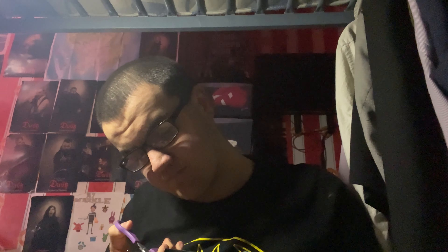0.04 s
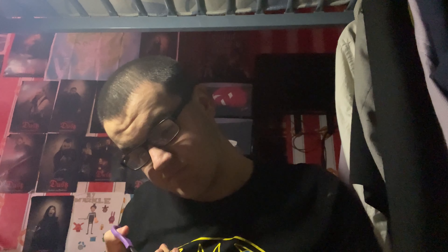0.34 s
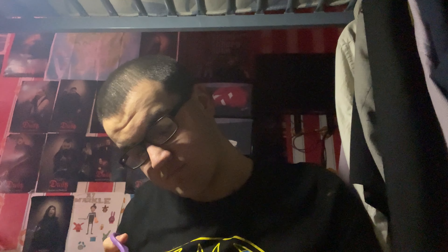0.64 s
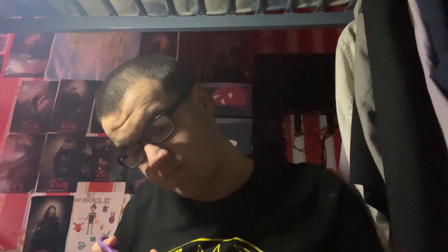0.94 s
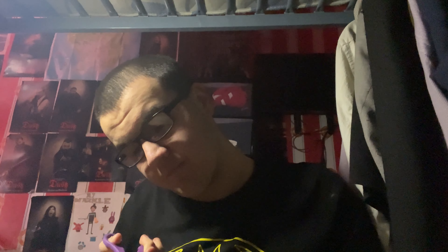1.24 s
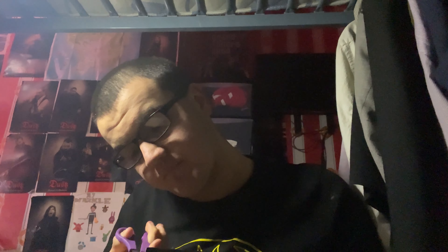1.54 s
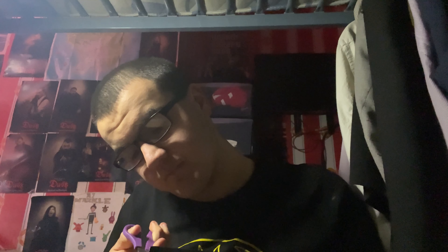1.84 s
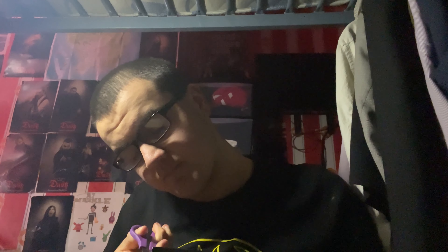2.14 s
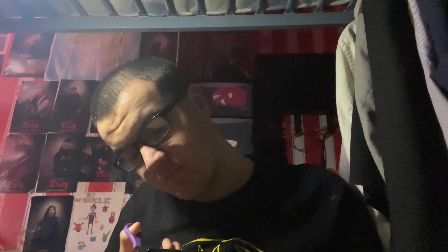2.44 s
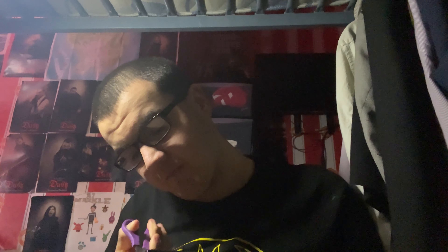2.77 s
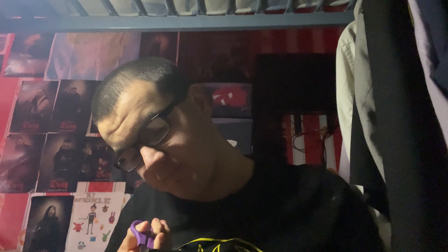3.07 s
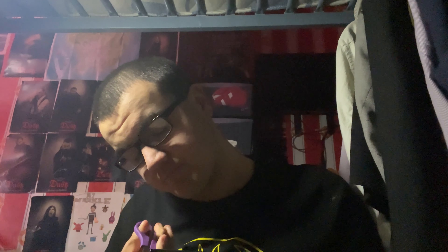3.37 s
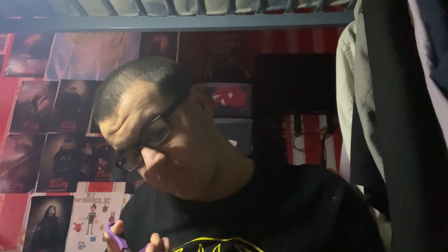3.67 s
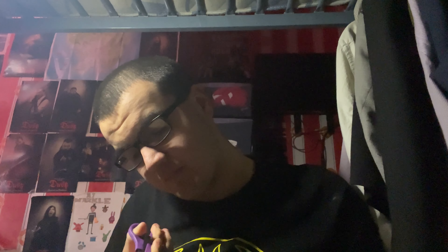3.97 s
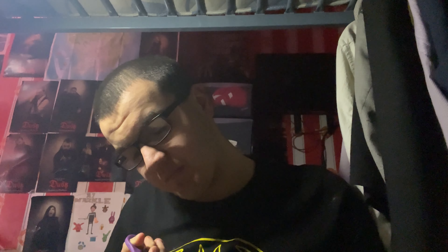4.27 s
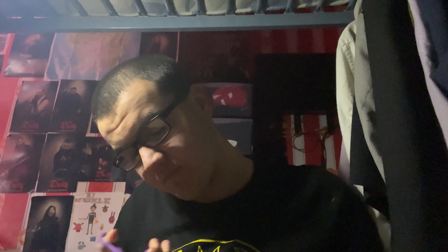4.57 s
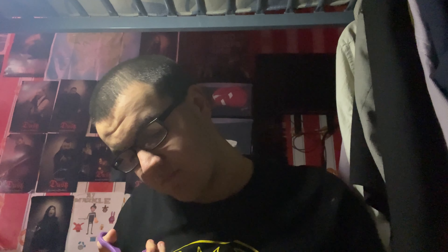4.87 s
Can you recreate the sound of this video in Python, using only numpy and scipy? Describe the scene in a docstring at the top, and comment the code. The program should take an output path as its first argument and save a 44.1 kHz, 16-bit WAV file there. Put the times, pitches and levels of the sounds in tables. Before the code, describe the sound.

Close up, a scissor blade slides in short, scratchy strokes along the taped seam of a cardboard box. Sharp, uneven snaps and small crackles break out as the tape gives, and the box booms softly under a hand. The middle is sparser, mostly separate clicks; then a heavy snap and a bright, sizzling crack with a thump stand out. The small room sounds dry, with a faint low rumble underneath.

```python
"""A faint tick, then soft booms and a low rub: scissors start through the packing tape of a cardboard box,
close to a phone microphone in a small, cluttered room. The blade slides along the seam; the tape
catches and snaps, and each snap rings the flaps and walls. A heavy snap shakes the walls, a bright one
cracks and sizzles; pushes on the box make the air inside it boom. A faint rumble lies underneath."""
import sys
import numpy as np
from scipy import signal
from scipy.fft import rfft, irfft, next_fast_len
from scipy.io import wavfile

SR = 44100
rng = np.random.default_rng(int(sys.argv[2]) if len(sys.argv) > 2 else 0)


def unload_audio(sound):
    """Save the sound as a 16-bit wav file, at the path given as the first command line argument."""
    columns = np.transpose(np.atleast_2d(sound))
    # keep every value between -1 and 1, then stretch to whole-number steps
    steps = np.round(np.clip(columns, -1, 1) * 32767)
    wavfile.write(sys.argv[1], SR, steps.astype(np.int16))


N = 225402
RING_S = np.arange(6000) / SR  # time since a blow


def undb(db):
    """Decibels to gain."""
    return 10 ** (np.asarray(db) / 20)


def unit(x):
    """Scale to rms 1."""
    return x / np.sqrt(np.mean(x ** 2))


def blow(x, db):
    """Give a short stereo sound the energy of 10 ms at this level."""
    return x * undb(db) * np.sqrt(SR / 100 / np.mean(np.sum(x ** 2, axis=1)))


def add(out, s, x):
    """Mix x into out from time s."""
    i = max(int(s * SR), 0)
    out[:, i:i + x.shape[1]] += x[:, :max(N - i, 0)]


def high_pass(x, hz):
    """Second-order bass cut."""
    return signal.sosfilt(signal.butter(2, hz, "high", fs=SR, output="sos"), x)


def colour(x, points):
    """Causal filter with a (Hz, dB) response."""
    n = 2 * next_fast_len(x.shape[1])
    hz, db = np.transpose(points)
    bin_hz = np.arange(n // 2 + 1) * SR / n
    log_gain = np.log(undb(np.interp(np.log(bin_hz + 1), np.log(hz), db)))
    cepstrum = irfft(log_gain)
    cepstrum[1:n // 2] *= 2  # fold to minimum phase
    cepstrum[n // 2 + 1:] = 0
    return irfft(rfft(x, n) * np.exp(rfft(cepstrum)))[:, :x.shape[1]]


def tilted(points, db_per_octave):
    """A spectrum leaned about its first point."""
    hz, db = np.transpose(points)
    return np.column_stack([hz, db + db_per_octave * np.log2(hz / hz[0])])


def stereo_noise(n, side_db):
    """White noise with this much side against mid."""
    mid, side = rng.standard_normal((2, n))
    return unit(mid + undb(side_db) * side * np.array([[1], [-1]]))


def wander(rate_hz):
    """Smooth random wander, spread near 1."""
    knots = rng.standard_normal(N // 100)
    return np.interp(np.arange(N) / SR * rate_hz, np.arange(len(knots)), knots)


def part_levels(parts, db, brightness):
    """Level of each part of a sound; a brighter contact lifts the higher parts more."""
    return [db + part_db + brightness * octaves for part_db, octaves in parts]


def ring(modes, centre_hz, octaves, rise_ms, scatter_db=3, lag_ms=0.18, spread_hz=2200):
    """Damped modes; the place of the blow favours those near one pitch."""
    hz, db, t60 = np.transpose(modes)
    detune, size, phase, skew = rng.standard_normal((4, len(modes)))
    gain = undb(db + scatter_db * size) / (1 + (np.log2(hz / centre_hz) / octaves) ** 4)
    poles = np.exp((2j * np.pi * hz * (1 + 0.021 * detune) - np.log(1000) / t60) / SR)
    # higher modes reach the two microphone ports less alike
    apart = 2 * np.pi * hz * lag_ms / 1000 + skew * hz / spread_hz
    starts = np.array([gain * np.exp(1j * (2 * np.pi * phase - shift)) for shift in (apart, 0)])
    ports = (starts @ np.vander(poles, len(RING_S), increasing=True)).imag
    return ports * (1 - np.exp(-(RING_S * 1000 / rise_ms) ** 2))


# The quiet room around the microphone. Each row: frequency in Hz, relative level in dB.
RUMBLE_SPECTRUM = [(22, -15.5), (52, 5.5), (90, 1), (170, -9), (330, -13), (560, -18.5), (800, -15.5),
                   (1100, -24), (2000, -29.5), (3500, -35), (8000, -42), (13000, -43), (15000, -57)]

def room_tone():
    """A faint rumble that wavers a little."""
    rumble = unit(colour(stereo_noise(N, side_db=-3), RUMBLE_SPECTRUM))
    return rumble * undb(-67 + 1.2 * wander(rate_hz=9))


def room_echo(x, t60_s, wet_db, gap_s):
    """Clothes and near walls return a short, dull echo to the microphone."""
    swell = 1 - np.exp(-(RING_S / gap_s) ** 2)
    tail = stereo_noise(len(RING_S), side_db=0) * swell * np.exp(-np.log(1000) * RING_S / t60_s)
    tail = colour(tail, [(80, 16), (400, 0), (900, -10), (2000, -8), (6000, -21), (14000, 1)])
    tail /= np.sqrt(np.mean(np.sum(tail ** 2, axis=1)))
    return x + undb(wet_db) * signal.fftconvolve(x, tail, axes=1)[:, :N]


# The air in the box. Each row: frequency in Hz, level in dB, time to fall 60 dB in seconds.
BOX_AIR_MODES = [(65, -9, 0.041), (81.5, 1, .13), (132, -3.5, .085), (173, -3.5, 0.12), (213, 2, .08)]
# The hand on the box. Each row: start in seconds, relative level in dB, boom centre in Hz.
HAND_PUSHES = [(.117, -48, 100), (0.223, -43, 89), (0.254, -32, 96), (0.464, -38.5, 111),
               (0.675, -38.5, 187), (0.732, -43, 86), (0.915, -48, 97), (1.8, -52, 127), (2.344, -52, 108),
               (2.872, -40, 233), (3.042, -33.5, 217), (3.435, -44.5, 131), (3.678, -45, 112),
               (4.18, -43, 80), (4.238, -41.5, 170), (4.517, -32.5, 150), (4.55, -27.5, 120.4)]

def pushes():
    """The box gives under the hand and booms softly; deeper booms take longer to build."""
    out = np.zeros((2, N))
    for s, db, hz in HAND_PUSHES:
        boom = ring(BOX_AIR_MODES, centre_hz=hz, octaves=.55, rise_ms=700 / hz, scatter_db=2)
        add(out, s, blow(boom, db + .5))
    return out * undb([[1.6], [-1.6]])  # a little left of the microphone


def crinkles(per_second, size, fade_ms):
    """Gain that jumps wherever a thread of glue lets go."""
    chance, sizes = rng.random(N), size * rng.exponential(size=N)
    jumps = (chance < per_second / SR) * sizes
    return 1 + signal.lfilter([1], [1, -np.exp(-1000 / (fade_ms * SR))], jumps)


# The stiff top flaps. Each row: frequency in Hz, level in dB, time to fall 60 dB in seconds.
TOP_FLAP_MODES = [(645, -17, 0.16), (727.7, -7, 0.071), (792, 2.5, 0.066), (894, -1.5, 0.048),
                  (1141, -9, 0.045), (1322, 1.5, 0.028), (1477, 4, 0.023), (1648, 4.5, 0.017),
                  (1717, 6, 0.022), (1992, 4, 0.025), (2178, 2.5, 0.032)]
# The blade dragging on them. Each row: frequency in Hz, relative level in dB.
DRAG_SPECTRUM = [(450, -21.5), (700, 3), (860, -3), (1040, -15), (1320, -3.5), (1750, -8.5), (2300, -14),
                 (3600, -44.5)]

def flap_scrape(grain, slip_db, hollow):
    """Slow slips let the flaps ring, so the scrape turns into a hollow creak."""
    slips = stereo_noise(N, side_db=-21.5) * grain
    flaps = ring(TOP_FLAP_MODES, centre_hz=900, octaves=0.18, rise_ms=1)
    creak = unit(signal.fftconvolve(slips, flaps, axes=1)[:, :N])
    drag = unit(colour(stereo_noise(N, side_db=0.5) * undb(slip_db), DRAG_SPECTRUM))
    return np.sqrt(hollow) * creak + np.sqrt(1 - hollow) * drag


# Walls and tape at close range. Each row: frequency in Hz, relative level in dB.
WALL_RUB_SPECTRUM = [(70, 1.5), (130, -4), (220, 2), (330, 5.5), (440, 2.5), (580, -18), (900, -46)]
RASP_SPECTRUM = [(1600, -13.5), (2600, 5), (3200, -0.5), (3800, 7), (5000, -2), (6600, 2.5), (8000, -27),
                 (11000, -28.5)]
SIZZLE_SPECTRUM = [(5500, -17), (7500, -10), (9000, -4), (11500, -2), (14000, -12), (16000, -9.5)]
# A stroke's rasp, then its hiss. Each row: level against the flaps in dB, octaves above them.
RASP_AND_HISS = [(-9, 0.5), (-22, 4.1)]
# The blade along the seam. Each row: moment of greatest speed in seconds, length in seconds,
# level in dB, weight on the walls in dB, brightness in dB per octave.
BLADE_STROKES = [(0.192, .2, -70.5, -1, 6), (0.256, .6, -61, 12.5, -3.5), (0.405, 0.15, -53.5, 2.5, -4),
                 (0.646, 0.37, -45, 3, 0.9), (0.742, .19, -43, -4, 0.5), (1.018, .18, -59, 3, -2),
                 (1.169, .18, -57, 0, -12), (1.444, .2, -59.5, 2.5, -9), (1.586, 0.27, -64, -9, 2.8),
                 (2.018, .18, -60, 0, -13), (2.384, 0.24, -59, 3.5, 0.8), (2.671, 0.6, -67.5, 1.5, -7),
                 (2.839, 0.33, -67.5, -4, 3.5), (3.086, 0.2, -56, 0, 2), (3.455, 0.16, -51, 2.5, 2),
                 (3.688, 0.71, -64, 8.5, -2.3), (3.929, .14, -55.5, -1, 0.6), (4.083, 0.22, -63, 7, 0.2),
                 (4.186, 0.077, -42.5, 8, 0.5), (4.55, .14, -41.5, 5.5, 1.5),
                 (4.714, 0.18, -63.5, -1, -0.5), (5.061, 0.35, -61.5, 9.5, -8.5)]

def slide():
    """The blade sticks and slips along the seam, shaking walls and flaps; the tape rasps and hisses."""
    t = np.arange(N) / SR
    speeds, levels_db = [], []
    for s, length_s, db, weight_db, brightness in BLADE_STROKES:
        speeds.append(np.interp(t, [s - length_s / 2, s, s + length_s / 2], [0, 1, 0]) ** 1.31)
        levels_db.append((db + weight_db, db, *part_levels(RASP_AND_HISS, db, brightness)))
    rub_gain, scrape_gain, rasp_gain, hiss_gain = undb(levels_db).T @ np.array(speeds)
    slip_db = 3 * wander(rate_hz=60) + 3.2 * wander(rate_hz=470)
    # on a slow slide single crinkles stand out; on a fast one they merge
    slow = 1 / (1 + rasp_gain / undb(-62.5))
    grain = crinkles(per_second=70, size=3, fade_ms=1) ** slow
    scrape = flap_scrape(grain, slip_db, hollow=.6 * slow)
    rub = unit(colour(stereo_noise(N, side_db=-9.5) * undb(slip_db), WALL_RUB_SPECTRUM))
    rasp = unit(colour(stereo_noise(N, side_db=-2) * grain * undb(.5 * slip_db), RASP_SPECTRUM))
    hiss_spectrum = tilted(SIZZLE_SPECTRUM, db_per_octave=-4.5)
    hiss = unit(colour(stereo_noise(N, side_db=-3.5) * grain * undb(.3 * slip_db), hiss_spectrum))
    return rub_gain * rub + scrape_gain * scrape + rasp_gain * rasp + hiss_gain * hiss


def glue_ticks(per_stroke, spread_db=6.5, stroke_share=0.39, tear_ms=2.5):
    """Threads of glue let go at random in mid-stroke: rows of small snaps in the stroke's own colour."""
    rows = []
    for s, length_s, db, weight_db, brightness in BLADE_STROKES:
        for place in (np.arange(per_stroke) + rng.random(per_stroke)) / per_stroke - .5:
            level_db = db - 10 + spread_db * rng.standard_normal()
            rows.append((s + stroke_share * length_s * place, level_db, weight_db, brightness, tear_ms))
    return rows


def tear(ms, spectrum, side_db, tail_db, tail_s, rise_ms=0.98):
    """A burst of tiny ruptures in the tape swells and dies, with a short scatter inside the box."""
    t_ms = RING_S * 1000
    burst = np.exp(-t_ms / (2 * ms)) + undb(tail_db) * np.exp(-RING_S / tail_s)
    swell = 1 - np.exp(-(t_ms / rise_ms) ** 2)
    return colour(stereo_noise(len(RING_S), side_db) * burst * swell, spectrum)


# The wide box walls. Each row: frequency in Hz, level in dB, time to fall 60 dB in seconds.
BOX_WALL_MODES = [(259, -3.5, 0.18), (304.4, -1.5, 0.076), (326.1, -1, 0.08), (391, -2, 0.044),
                  (415.7, -7, 0.11), (452.6, 0.5, 0.07), (560, -11.5, 0.048)]

def cardboard_knock(flap_db, weight_db, tear_ms):
    """Harder snaps ring the walls higher; weight on the walls rings the flaps lower."""
    wall_hz = 352 * 2 ** ((flap_db + 45.5) / 106)
    flap_hz = 1089 * 2 ** (-weight_db / 56)
    walls = ring(BOX_WALL_MODES, wall_hz, octaves=0.44, rise_ms=0.7)
    flaps = ring(TOP_FLAP_MODES, flap_hz, octaves=0.67, rise_ms=.5 * tear_ms, lag_ms=.11, spread_hz=2000)
    return blow(high_pass(walls, hz=227), flap_db + weight_db) + blow(high_pass(flaps, hz=450), flap_db)


# The scissor blades. Each row: frequency in Hz, level in dB, time to fall 60 dB in seconds.
STEEL_MODES = [(2756, 6, 0.025), (3166, -4, 0.041), (3442, -7, 0.038), (3766, 3, 0.023), (4082, -2, 0.022),
               (5200, -11, 0.029), (5576, -2, 0.017), (5950, -6, .022), (6120, -7.5, 0.013)]

def blade_clink(sharpness):
    """Steel damped by hand and tape; a sharper contact rings it higher."""
    return ring(STEEL_MODES, centre_hz=3750 * 2 ** sharpness, octaves=.55, rise_ms=0.4,
                scatter_db=8.5, lag_ms=.05, spread_hz=3000)


# Breaking tape at close range. Each row: frequency in Hz, relative level in dB.
CRUNCH_SPECTRUM = [(400, -15.5), (650, 0.5), (850, 11.5), (1030, -2), (1320, -11), (1750, -9), (2300, -4),
                   (3500, -39.5)]
CRACK_SPECTRUM = [(1500, -25.5), (2300, -2), (2700, -0.5), (3200, -9.5), (3750, -14), (4400, -1),
                  (5000, -8), (6300, -10.5), (7500, -11), (10000, -52)]
# A snap's crack, then its sizzle. Each row: level against the flaps in dB, octaves above them.
CRACK_AND_SIZZLE = [(-5, 1.62), (-20, 3.62)]
# Snaps and blade ticks, just in front of the microphone. Each row: start in seconds, flap level in dB,
# weight on the walls in dB, brightness in dB per octave, tear length in milliseconds.
TAPE_SNAPS = [(.0632, -62.5, 1, 0, 2.4), (.2479, -47, 11.5, -20, 7.1), (.4026, -46.5, -9, -8, 1.1),
              (.456, -46.5, 10.5, -22, 24), (.6695, -33.5, -8, 0.4, 2.9), (.6729, -32, 3, -2, 2.8),
              (.6783, -38, -5, 0.5, 17), (.7307, -29, -14.5, -4, 5.4), (.8306, -51, -0.5, 1, .5),
              (.9598, -54.5, 2.5, -4, 4.2), (.9988, -37, -15.5, 1, 1.5), (1.0425, -49, -1, 0, 1.5),
              (1.0639, -51, -6, 0.9, .8), (1.1186, -49.5, -7, -4, 1.9), (1.1376, -49.5, -2, -1.5, 4.6),
              (1.153, -46.5, -1, -4, 1), (1.3358, -65, 15.5, -13, 9.5), (1.3849, -58.5, 2, 0.5, 1.1),
              (1.4278, -45, -8, -9, 2), (1.4543, -50, -12, -4, 7.7), (1.5122, -34, -6.5, 0, 3.4),
              (1.638, -30, 2.5, -2, 1.03), (1.7977, -47.5, 0, 1.5, .9), (1.859, -52.5, -8.5, 2.5, 0.67),
              (1.9755, -52, 3.5, -18.5, 2.6), (2.2838, -64.5, 13.5, -15, 4.4), (2.333, -39.5, -1, 4.5, 1.6),
              (2.3963, -52, 7, -21, 5.7), (2.4467, -65.5, -28, 4.5, 2.9), (2.5675, -43, -20, -8, 2.8),
              (2.6627, -45, -12, -1, 0.25), (2.785, -67.5, 22, 5.5, 3.7), (2.8109, -53.5, 8, -0.5, 1.8),
              (2.873, -30.5, -5.5, -9, 1.5), (2.9071, -74.5, 4, 8.5, .7), (3.016, -54, -19.5, -1, 1),
              (3.0402, -25.5, -3.5, -1.5, 1.2), (3.1174, -44.5, -7, 3, 0.62), (3.273, -64.5, -7, -20, 4.7),
              (3.4075, -48, -2.5, 6.5, 0.52), (3.4312, -42, 3, 2.5, 0.73), (3.5997, -45, -16, -1.5, 0.13),
              (3.6593, -53.5, -10, .5, 1.6), (3.6704, -51.5, 4, -2.5, 0.69), (3.692, -45.5, -8.5, -7, 2.6),
              (3.8118, -51.5, 5.5, 1, 0.39), (4.0633, -46.5, -13, -2.5, 1.2), (4.1585, -38, -6, 1, 2.4),
              (4.1667, -32.5, -8.5, -1.5, 0.48), (4.172, -42.5, 21, 4.5, 6.5), (4.1774, -32, 3, -5.5, 2.7),
              (4.1959, -50.5, 6.5, -9, 1.3), (4.2428, -54, 13, -0.5, 12), (4.3979, -57.5, 10.5, -8.5, 1.9),
              (4.511, -36, 3.5, 1.5, 8.8), (4.5374, -17, -22, 2.03, 1.13), (4.5422, -22.5, -0.5, -7, 3.2),
              (4.5505, -23, 6.5, -6.5, 3.6), (4.6316, -49, 1, -9, 2), (4.6467, -55.5, 5, 1, 4),
              (4.6699, -62.5, 1, 3.5, 2.9), (4.7245, -33.5, -17, 0.5, 1.26), (4.7449, -49, -15, 4, 1.4),
              (4.8528, -60.5, 2, 4, 0.89), (5.006, -40.5, -4, -11, 6.6), (5.0641, -36.5, -16, 1, .7),
              (5.0861, -35, 1, -4, 0.67)]

def snaps(rows):
    """The tape gives way with a crunch, crack and sizzle; the cardboard knocks and the blades clink."""
    out = np.zeros((2, N))
    for s, flap_db, weight_db, brightness, tear_ms in rows:
        crack_db, sizzle_db = part_levels(CRACK_AND_SIZZLE, flap_db, brightness)
        sharpness = np.clip((sizzle_db - crack_db + 18) / 28, -1, 1)
        knock = cardboard_knock(flap_db, weight_db, tear_ms)
        crunch = tear(tear_ms, CRUNCH_SPECTRUM, side_db=2, tail_db=-11.5, tail_s=0.016)
        clink = blade_clink(sharpness)
        crack_spectrum = tilted(CRACK_SPECTRUM, db_per_octave=sharpness)
        crack = tear(0.96 * tear_ms, crack_spectrum, side_db=2, tail_db=-30.5, tail_s=0.02)
        # harder snaps reach higher
        sizzle_spectrum = tilted(SIZZLE_SPECTRUM, db_per_octave=0.24 * (sizzle_db + 54.5))
        sizzle = tear(.65 * tear_ms, sizzle_spectrum, side_db=-6, tail_db=-22, tail_s=.009, rise_ms=.6)
        tape = blow(crunch, flap_db - 7.5) + blow(crack, crack_db - 3.5) + blow(sizzle, sizzle_db)
        add(out, s, knock + tape + blow(clink, crack_db - 2.9))
    return out * undb([[-0.05], [0.05]])  # almost dead centre


def scene():
    """Box and scissors close to the microphone, the small room faint behind them."""
    rumble = room_tone()
    blows = snaps(TAPE_SNAPS) + pushes() + snaps(glue_ticks(per_stroke=2))
    return rumble + room_echo(blows, t60_s=0.33, wet_db=-25, gap_s=0.02) + slide()


def record(dry):
    """The phone cuts the deep bass and the top."""
    top_cut = signal.ellip(8, .2, 70, 15800, fs=SR, output="sos")
    return signal.sosfilt(top_cut, high_pass(dry, hz=33.3))


dry = scene()
out = record(dry)
unload_audio(out)
```